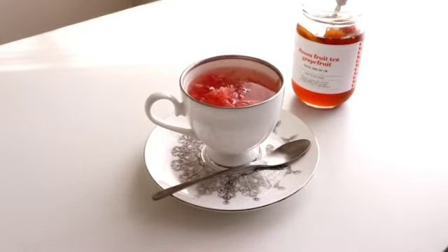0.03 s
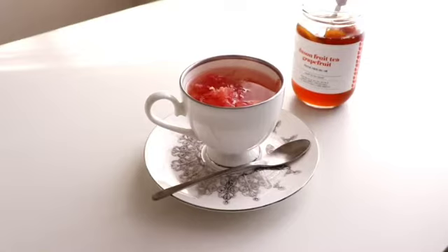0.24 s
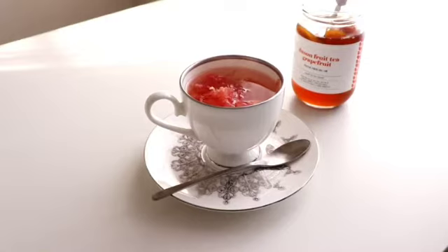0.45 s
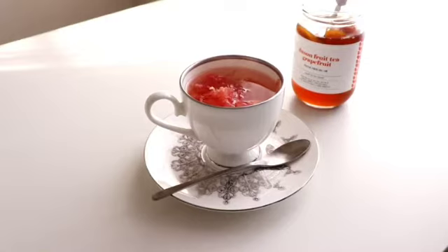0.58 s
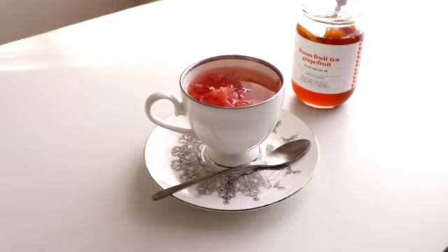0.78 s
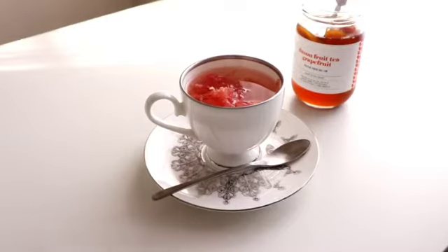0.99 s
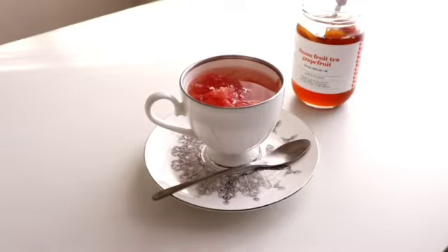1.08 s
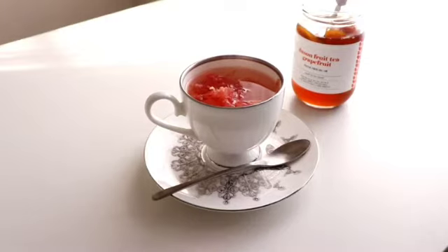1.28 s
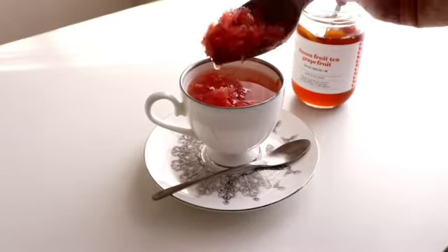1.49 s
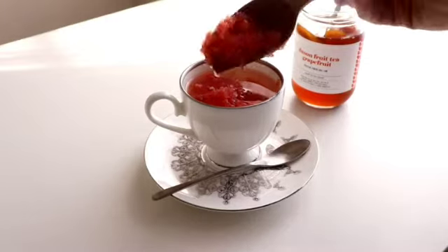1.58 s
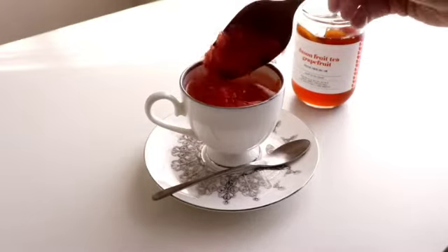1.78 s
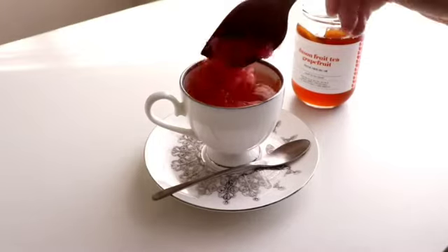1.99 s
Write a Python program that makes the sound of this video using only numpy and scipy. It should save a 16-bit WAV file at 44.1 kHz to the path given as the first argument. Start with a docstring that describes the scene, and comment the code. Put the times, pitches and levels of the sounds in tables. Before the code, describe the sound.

A spoon clinks once against a dish, then fruit preserve plops softly into tea.

```python
"""A quiet kitchen, with mains hum, steady room noise and a thin hiss that falls and fades at the start.
A spoon knocks once against tableware, exciting its modes, close enough to overload the right microphone.
An arm rustles as it brings a spoonful of fruit preserve to a teacup. A lump drops into the tea with a
small plop (a slap, the cup's resonance and a bubble), and the sticky spoon ticks faintly.
Knock, slap and ticks echo off the table and reverberate briefly in the room."""
import sys
import numpy as np
from scipy import signal
from scipy.fft import rfft, irfft
from scipy.io import wavfile
from scipy.ndimage import uniform_filter1d

SR = 44100
rng = np.random.default_rng(int(sys.argv[2]) if len(sys.argv) > 2 else 0)


def output_pcm(signal):
    """Save a mono or channel-first signal as 16-bit PCM at the path in sys.argv[1].

    Samples are clipped to [-1, 1] before scaling.
    """
    pcm = np.clip(np.atleast_2d(signal).T, -1, 1) * 32767
    wavfile.write(sys.argv[1], SR, np.round(pcm).astype(np.int16))


N = 90404
T = np.arange(N) / SR

# Coherence of the room's sound field. Each row: frequency in Hz, left-right correlation.
COHERENCE = [(25, 1), (60, 0.66), (200, 0.77), (640, 0.54), (1400, 0.23), (3000, 0.026), (16000, 0)]
# Room decay. Each row: frequency in Hz, t60 in seconds (a negative value acts as 0.1 ms).
REVERB_T60 = [(150, 0.1), (600, 0.3), (2500, 0.2), (6000, 0.42), (14000, -0.7)]
# Strength of the reverberation. Each row: frequency in Hz, relative level in dB.
REVERB_SPECTRUM = [(150, -9), (560, -9.5), (1300, -12), (2800, -17.5), (3700, -13), (5000, -18.5),
                   (6400, -17.5), (8000, -23.5), (14000, -30)]
# Mains hum. Each row: time in seconds, level at 120 Hz in dB, level at 180 Hz in dB.
HUM_LEVELS = [(0, -50, -50.5), (.2, -54, -72), (.27, -59.5, -55.5), (.35, -51, -52), (.55, -51, -57),
              (.7, -56, -53.5), (1.03, -54.5, -51), (1.22, -53.5, -47), (1.55, -53.5, -51),
              (1.76, -54, -57), (1.86, -81, -69), (2.05, -85, -60)]
# Spectra of room noise, arm rustle and arm rumble. Each row: frequency in Hz, relative density in dB.
ROOM_NOISE_SPECTRUM = [(20, -11.5), (55, -5), (100, -2.5), (200, -1), (330, -4.5), (600, -9), (1200, -12.5),
                       (3000, -17), (7000, -22), (11000, -28), (16000, -32)]
RUSTLE_SPECTRUM = [(200, -18), (900, -5), (2000, 1), (3800, -1.5), (7000, -6.5), (10000, -9.5),
                   (16000, -21.5)]
RUMBLE_SPECTRUM = [(15, -19), (45, 0), (75, -16), (120, -9), (500, -53), (2000, -80)]
# Arm rustles. Each row: centre in seconds, half width in seconds, level in dB, tilt in dB per octave.
RUSTLE_SWELLS = [(0.023, 0.016, -53, 3.5), (0.424, 0.014, -55, 2), (0.499, 0.018, -51, 1.5),
                 (0.586, 0.047, -56.5, 3), (0.881, 0.058, -49.5, 0), (0.979, .055, -53.5, 1),
                 (1.188, 0.024, -59.5, 4.5), (1.266, 0.028, -55.5, 4), (1.324, 0.022, -52.5, 0.5),
                 (1.43, 0.059, -56, 2.5)]
# Ticks of the sticky spoon. Each row: start in seconds, frequency in Hz, level in dB, t60 in seconds.
STICKY_TICKS = [(1.9527, 7000, -45, .004), (2.0317, 5170, -33, 0.0055), (2.0349, 2220, -33, 0.009),
                (2.0362, 14800, -28.5, 0.005), (2.0449, 7700, -31.5, 0.0035), (2.0452, 12100, -33, .004)]
# Impact spectra of lump on tea and spoon on dish. Each row: frequency in Hz, relative level in dB.
SLAP_SPECTRUM = [(60, -27), (250, -3), (520, 4.5), (1300, 9), (2000, 8.5), (2700, 5), (3300, -15),
                 (4700, -17.5), (6500, -29), (16000, -44)]
CRACK_SPECTRUM = [(100, -3), (250, -1), (450, 6.5), (1200, 14), (3000, 11.5), (5500, 1), (7200, 9.5),
                  (8300, -4.5), (9500, 6.5), (12000, -11.5), (16000, -12)]
# Resonances of the cup's hollow. Each row: frequency in Hz, relative level in dB, t60 in seconds.
CUP_MODES = [(602, -36.5, 0.11), (1127, -39.5, 0.079), (1320, -36, 0.079), (1500, -32.5, 0.036)]
# Modes of the dish and the held spoon. Each row: frequency in Hz, relative level in dB,
# t60 in seconds, left minus right in dB, relative level of the lingering ring in dB.
TABLEWARE_MODES = [(552.4, -17.5, 0.066, -5, -34.5), (928, -18.5, 0.022, -1, -56),
                   (1355, -10.5, 0.0043, 0.5, -49), (1766, -17, 0.027, -0.5, -35),
                   (1856, -18, 0.046, -19, -49), (2294, -10, 0.021, -0.5, -64),
                   (2430, -14, 0.041, -22, -32), (2816, -3.5, 0.021, -8.5, -42),
                   (3732, -13.5, 0.024, -6, -46), (4084, -7, 0.0099, -37, -63),
                   (4703, -13.5, 0.033, -16, -49), (4980, -6.5, 0.023, -11.5, -48),
                   (5960, -19, .03, -5.5, -55), (6474, -18.5, 0.034, -13, -56)]


def amp(db):
    """Amplitude grows tenfold for every 20 dB."""
    return 10 ** (np.asarray(db) / 20)


def unit(x):
    """Normalisation to an rms of 1."""
    return x / np.sqrt(np.mean(x ** 2) + 1e-20)


def read(points, hz):
    """Interpolation on a logarithmic frequency axis."""
    f, value = np.transpose(points)
    return np.interp(np.log(hz + 1), np.log(f + 1), value)


def pan(left_db):
    """Direction as a level difference: left and right gains, the right being 1."""
    return np.array([[amp(left_db)], [1.]])


def since(start):
    """Seconds since an onset, zero before it."""
    return np.maximum(T - start, 0)


def fade(t, t60):
    """Exponential damping, 60 dB in t60 seconds."""
    return np.exp(-np.log(1000) * t / np.maximum(t60, 1e-4))


def click(start, spectrum):
    """An impact as a minimum-phase pulse: the Hilbert transform gives its phase from its spectrum."""
    hz = np.fft.fftfreq(4096, 1 / SR)
    log_magnitude = np.log(amp(read(spectrum, abs(hz))))
    pulse = np.fft.ifft(np.exp(np.conj(signal.hilbert(log_magnitude)))).real[:len(hz) // 2]
    return np.pad(pulse, (round(start * SR), N))[:N]


def diffuse_noise(spectrum, tilt_db=0):
    """A diffuse field is alike at two microphones in the bass and uncorrelated in the treble."""
    hz = np.fft.rfftfreq(N, 1 / SR)
    left, independent = rfft(rng.standard_normal((2, N)))
    coherence = read(COHERENCE, hz)
    right = coherence * left + np.sqrt(1 - coherence ** 2) * independent
    colour = amp(read(spectrum, hz) + tilt_db * np.log2(hz + 1))
    return unit(irfft(np.array([left, right]) * colour, N))


def table_echoes(x):
    """Early reflection off table, saucer and jar: convolution with sparse, bright echoes."""
    t = T[:SR // 8]
    taps = rng.standard_normal((2, len(t))) * (rng.random((2, len(t))) < .1)
    taps = taps * fade(t, t60=.03) * (t > .001)
    taps = signal.sosfilt(signal.butter(2, 915, "high", fs=SR, output="sos"), taps)
    taps /= np.linalg.norm(taps, axis=1, keepdims=True)
    return amp(-9.5) * signal.fftconvolve(x, taps, axes=1)[:, :N]


def reflections(x, tail_db=0, echo_db=0, hold_s=.042):
    """Reverberation: early echoes and a diffuse tail that builds, holds and decays band by band."""
    build_s = .0092
    hz, t, bands = signal.stft(rng.standard_normal((2, SR // 2)), SR, nperseg=256)
    coherence = read(COHERENCE, hz)[:, None]
    bands[1] = coherence * bands[0] + np.sqrt(1 - coherence ** 2) * bands[1]
    envelope = fade(np.maximum(t - build_s - hold_s, 0), read(REVERB_T60, hz)[:, None])
    envelope *= np.minimum(t / build_s, 1) ** 2
    energy = (envelope ** 2).sum(1, keepdims=True) * t[1] * SR
    envelope *= amp(read(REVERB_SPECTRUM, hz))[:, None] / np.sqrt(energy)
    response = signal.istft(bands * envelope, SR)[1]
    tail = signal.fftconvolve(x[1:], response, axes=1)[:, :N]
    return amp(echo_db) * table_echoes(x) + amp(tail_db) * tail


def hum_and_room_noise(mains_hz=60):
    """The second and third harmonics of the mains waver in level over steady broadband noise."""
    times, *levels = np.transpose(HUM_LEVELS)
    hum = 0
    for harmonic, db in enumerate(levels, 2):
        tone = unit(np.sin(2 * np.pi * (harmonic * mains_hz * T + rng.random())))
        hum += amp(np.interp(T, times, db)) * tone
    return hum + amp(-50) * diffuse_noise(ROOM_NOISE_SPECTRUM)


def thin_hiss(start_hz=13800, fall_hz_per_s=15000, width_hz=920):
    """Modulation centres a narrow noise band on a carrier, which falls an octave as the hiss fades."""
    band = signal.sosfilt(signal.butter(2, width_hz / 2, fs=SR, output="sos"), rng.standard_normal((2, N)))
    hz = np.maximum(start_hz - fall_hz_per_s * T, start_hz / 2)
    carrier = np.cos(2 * np.pi * np.cumsum(hz) / SR)
    return amp(-57) * fade(T, t60=.67) * unit(band * carrier)


def swell(centre_s, half_width_s):
    """A Gaussian envelope with a peak of 1."""
    return np.exp(-((T - centre_s) / half_width_s) ** 2 / 2)


def moving_arm(grain_db=1.54, grain_s=.008):
    """Amplitude-modulated noise: the arm rustles in grainy swells, with one low rumble as it comes in."""
    rustle = sum(amp(db) * swell(centre, half_width) * diffuse_noise(RUSTLE_SPECTRUM, tilt)
                 for centre, half_width, db, tilt in RUSTLE_SWELLS)
    grain = unit(uniform_filter1d(rng.standard_normal(N), round(grain_s * SR)))
    rumble = amp(-53) * swell(centre_s=1.353, half_width_s=.043) * diffuse_noise(RUMBLE_SPECTRUM)
    return rustle * amp(grain_db * grain) + rumble


def sticky_spoon():
    """Each sticky snap is a heavily damped oscillation with a puff of noise."""
    snaps = np.zeros(N)
    for start, hz, db, t60 in STICKY_TICKS:
        t = since(start)
        puff = amp(-8) * rng.standard_normal(N)
        snaps += amp(db) * fade(t, t60) * (t > 0) * (np.sin(2 * np.pi * hz * t) + puff)
    snaps = pan(left_db=-4) * snaps
    return snaps + reflections(snaps)


def lump_plop(start_s=1.7766, bubble_hz=240.6, rise_hz_per_s=530, swell_s=.043):
    """Cavity resonance: the lump slaps the tea, rings the cup's hollow and leaves a bubble of rising pitch."""
    t = since(start_s)
    hollow = sum(amp(db) * fade(t, t60) * np.sin(2 * np.pi * hz * t) for hz, db, t60 in CUP_MODES)
    slap = -amp(-1) * pan(left_db=-1.5) * (click(start_s, SLAP_SPECTRUM) + hollow)
    cycles = bubble_hz * t + rise_hz_per_s * t ** 2 / 2
    bubble = amp(-31) * np.minimum(t / swell_s, 1) * fade(t, t60=.18) * np.sin(2 * np.pi * cycles)
    return slap + reflections(slap, tail_db=1.5, echo_db=4.5, hold_s=.013) + bubble


def spoon_knock(start_s=.24595, left_lag_s=.0001, crack_lag_s=.00023, twin_ratio=1.006, ring_rise_s=.025):
    """Modal vibration: a hard contact cracks and excites short-lived modes, leaving a faint ring."""
    t = np.array([since(start_s + left_lag_s), since(start_s)])
    knock = pan(left_db=-9.5) * click(start_s + crack_lag_s, CRACK_SPECTRUM)
    ring = 0
    for k, (hz, db, t60, left_db, ring_db) in enumerate(TABLEWARE_MODES):
        mode = (-1) ** k * np.sin(2 * np.pi * hz * t)
        twin = (-1) ** k * np.sin(2 * np.pi * hz * twin_ratio * t)
        knock += pan(left_db) * amp(db) * fade(t, t60) * mode
        ring += amp(ring_db) * (mode + amp(-4) * twin)  # close frequencies beat
    ring *= fade(t, t60=.27) * np.minimum(t / ring_rise_s, 1)
    return amp(1) * (knock + reflections(knock) + ring)


def scene():
    """Superposition: the pressures of all sources add at the two microphones."""
    return spoon_knock() + lump_plop() + sticky_spoon() + moving_arm() + thin_hiss() + hum_and_room_noise()


def record(dry, cutoff_hz=15800):
    """Overload clips the peaks at full scale; a low-pass filter then removes the highest treble."""
    low_pass = signal.firwin(511, cutoff_hz, window=("kaiser", 9), fs=SR)
    return signal.oaconvolve(np.clip(dry, -1, 1), low_pass[None], "same")


dry = scene()
out = record(dry)
output_pcm(out)
```